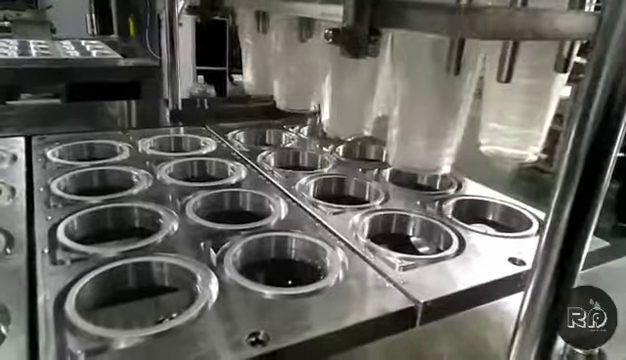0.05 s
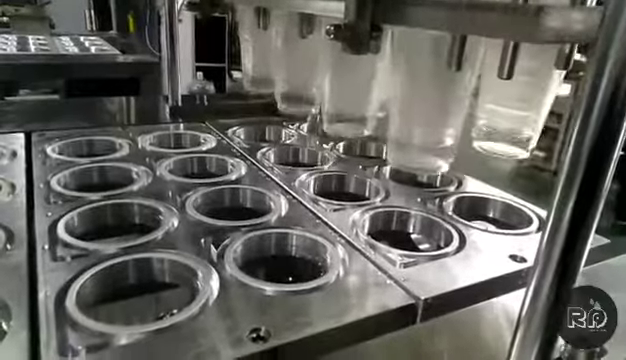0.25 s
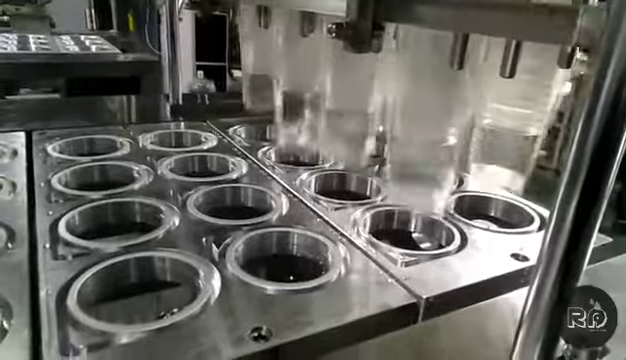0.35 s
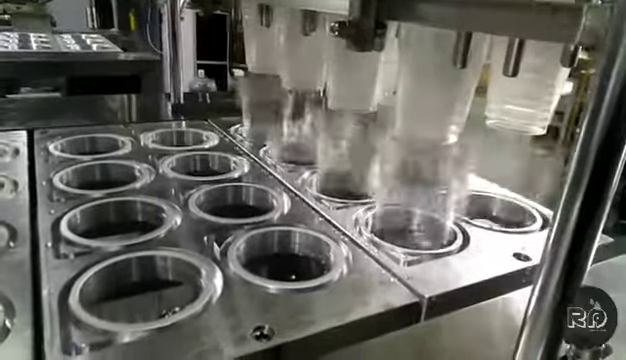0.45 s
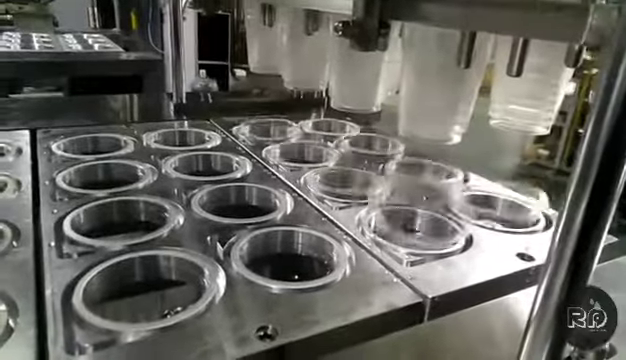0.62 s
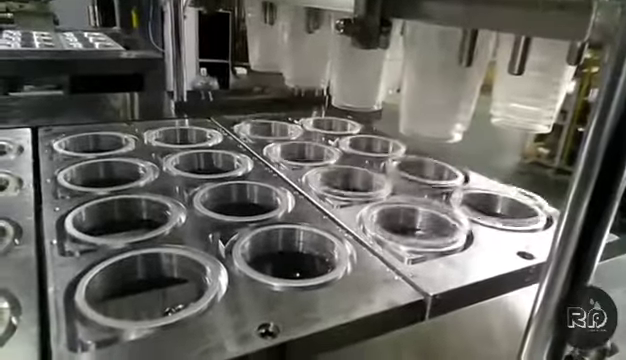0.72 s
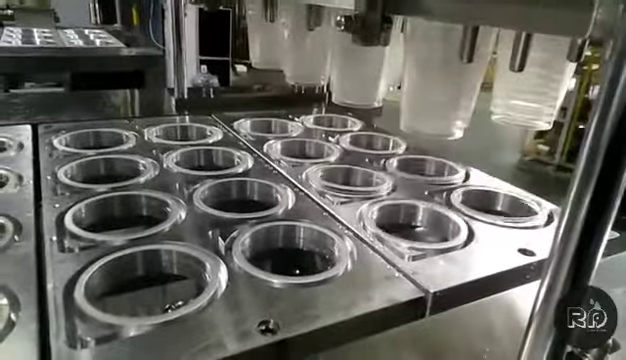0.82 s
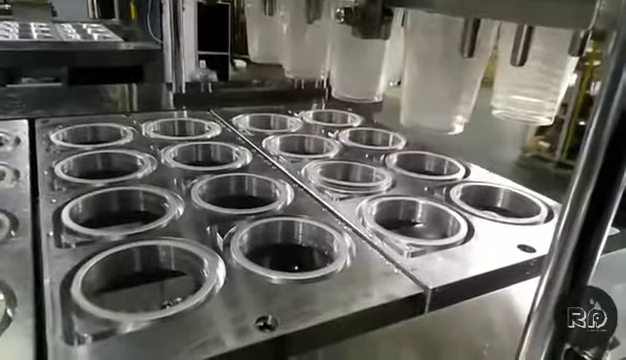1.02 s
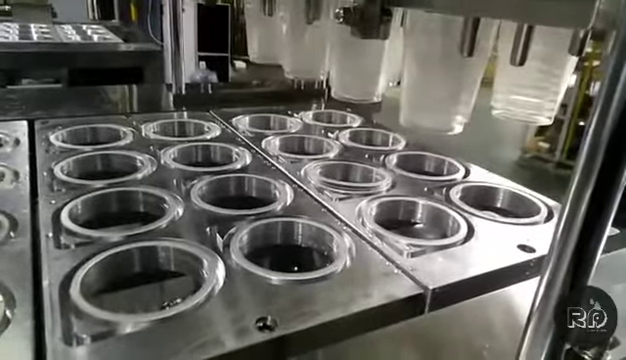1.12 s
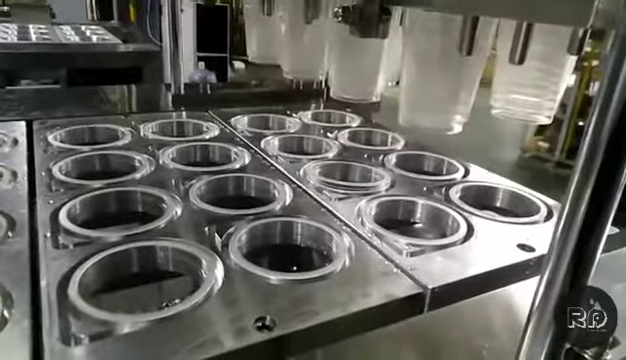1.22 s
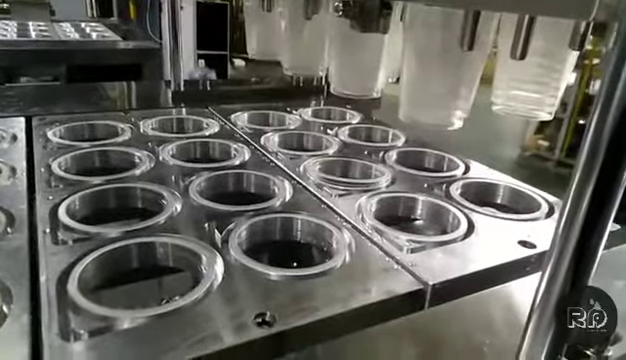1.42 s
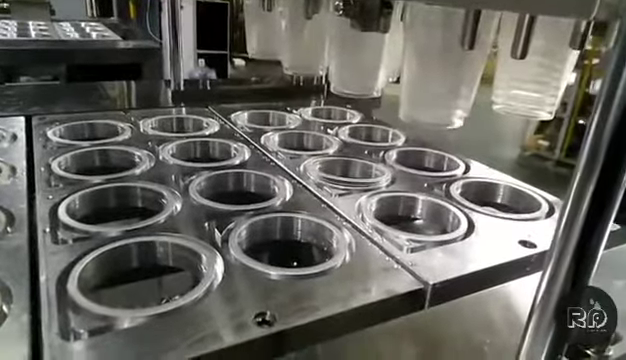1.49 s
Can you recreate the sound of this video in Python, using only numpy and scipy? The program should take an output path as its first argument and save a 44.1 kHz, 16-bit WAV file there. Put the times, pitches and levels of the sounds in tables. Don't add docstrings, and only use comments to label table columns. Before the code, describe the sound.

Plastic cups dropping in a machine: after a near-silent start, a valve snaps open at 0.2 s with bright, slightly whistling air hiss, fading by 0.6. Cups scrape loose around 0.5, clatter hollowly at 0.6-0.68, and rattle until 0.85, with a hard clack at 0.81. A stronger air burst at 0.88 decays by 1.4. Low rolling rumble and hall hum continue, with dull knocks near 1.3.

```python
import sys
import numpy as np
from scipy import signal
from scipy.fft import rfft, irfft, next_fast_len
from scipy.io import wavfile
from scipy.ndimage import uniform_filter1d, map_coordinates

SR = 44100
rng = np.random.default_rng(int(sys.argv[2]) if len(sys.argv) > 2 else 0)


def volts(x):
    e = np.asarray(x, float) / 20
    return 10 ** e


def to_wav(s):
    ch = np.atleast_2d(s).T
    pcm = np.round(np.clip(ch, -1, 1) * 32767)
    wavfile.write(sys.argv[1], SR, pcm.astype(np.int16))


N = 68355

# [f/Hz, density/dB]
HALL_SPECTRUM = [(35, -63), (60, -14.5), (189, -7.5), (461, -8.5), (593, -20), (855, -11), (1380, -25),
                 (1700, -18.5), (14300, -33)]
# [f/Hz, level/dB]
MOTOR_TONES = [(748, -44.5), (243, -50)]
HALL_DB, MOTOR_SWAY_DB = -37, 2.5
SETTLE_S, SETTLE_DB = 0.12, -13.5

# [middle t/s, half length/s, level/dB]
LEAKS = [
    (0.088, 0.07, -41.5),
    (0.769, 0.037, -38),
    (1.42, 0.23, -56.5),
]
# [t/s, level/dB, T60/s]
VALVE_TICKS = [
    (.2095, -23, 0.01),
    (0.5954, -22, 0.015),
    (0.8132, -22, 0.0072),
    (.8762, -12.5, 0.031),
    (1.38, -30.5, .012),
    (1.464, -47, 0.033),
]
# [f/Hz, density/dB]
LEAK_SPECTRUM = [(7000, -7.5), (10500, -9.5), (12500, -9.5), (14200, -0.5)]

# [t/s, level/dB]
VENT_PRESSURES = [
    [(.082, -47), (.109, -43), (.15, -46.5), (.2, -46.5)],
    [(.2015, -35.5), (.2085, -29), (.2095, -20.5), (.222, -19), (.272, -21.5), (.29, -23.5), (.35, -23.5),
     (.45, -28), (.59, -36.5)],
    [(.8752, -44), (.8765, -17.5), (.9, -16.5), (.95, -19.5), (1.04, -22), (1.15, -28), (1.3, -36.5),
     (1.46, -46.5), (1.55, -84)],
    [(.6, -26.5), (.7, -39), (.87, -41.5)],
]
# [fizz level/dB, roar level/dB]
VENT_COLOURS = [(-2, 4), (3.5, -3), (1.7, 0), (-0.5, 0.1)]
# [f/Hz, density/dB]
JET_SPECTRUM = [(880, -14), (1500, -12), (2500, -12.5), (3300, -6), (4300, -3.5), (5400, -2.5),
                (7500, -1.5), (14300, -20)]
# [f/Hz, density/dB]
FIZZ_SPECTRUM = [(3000, -75), (7000, -9), (9000, -1.5), (11000, -8), (12500, -7), (13700, -4.5), (14400, 1)]
# [f/Hz, density/dB]
ROAR_SPECTRUM = [(200, 10.5), (500, 5.5), (1200, 4), (2500, 3), (4000, -46)]
FULL_DB, FIZZ_DB, ROAR_DB = -20, -2, -13
FIZZ_GROWS, ROAR_GROWS = 2.41, 1.8
FIZZ_OFFSET_DB = -3
JET_ALIKE, LEFT_LAG_S = 0.14, 0.000389
# [opening t/s, shutting t/s, level/dB]
WHISTLES = [
    (0.2114, 0.268, -25),
    (0.8726, 0.957, -30.5),
]
MUFFLER_HZ, MUFFLER_WIDTH_HZ, SHUT_T60_S = 5070, 900, 0.12

# [t/s, level/dB]
CARRIAGE_EFFORT = [(0.1, -100), (0.136, -93), (0.26, -41), (0.338, -37), (0.378, -36), (0.684, -32.5),
                   (0.894, -33.5), (1.06, -34.5), (1.222, -41), (1.55, -42)]
# [f/Hz, width/Hz, level/dB]
FRAME_MODES = [(249.5, 73, 2.5), (392, 97, -2.5), (520, 307, -9.5), (765, 100, -10), (900, 580, -19)]
FRAME_LOW_HZ = 185

# [t/s, peak level/dB, f/Hz, T60/s]
KNOCKS = [(0.17, -31, 228, 0.091), (0.208, -17, 331, 0.037), (.209, -24, 39.3, 0.17), (.594, -23, 42, 0.12),
          (0.626, -19, 2390, 0.044), (.595, -11, 318, 0.037), (.605, -9, 1244, .028),
          (0.6262, -10, 438, 0.044), (.636, -15, 400, 0.031), (0.663, -23, 427, 0.053),
          (.673, -21, 362, 0.076), (.651, -28, 414, 0.027), (0.752, -19.5, 342, 0.047),
          (.786, -16, 427, 0.082), (0.8343, -20, 493, .06), (.786, -18, 1444, 0.027),
          (.787, -24, 2350, 0.026), (0.8137, -6, 513, 0.023), (.8138, -11.5, 1950, 0.017),
          (.814, -32, 40, 0.15), (.877, -27, 60.7, 0.089), (1.288, -22.5, 238, 0.093),
          (1.321, -17, 306, 0.031), (1.534, -38, 1700, 0.056)]
# [f/Hz, T60/s]
ROOM_DECAY = [(200, 0.6), (2000, 0.44), (10000, 0.71)]
ROOM_DB = -6

# [t/s, peak level/dB, pitch factor, favoured f/Hz, crackle level/dB]
CUP_CONTACTS = [(.285, -29, 1.36, 496, -30), (0.409, -27.5, 1.05, 310, -28), (0.481, -20.5, 1.12, 485, -5),
                (.487, -31, 1.07, 1600, -8.5), (0.495, -25, 1.1, 900, -21), (0.504, -18.5, 1.1, 450, -19),
                (0.52, -19.5, 0.64, 306, -22), (0.544, -30, 1.23, 560, -28), (0.551, -25, 1.09, 400, -25),
                (.595, -11.5, 1.04, 636, -11.5), (0.601, -22.5, 1.01, 1190, -14),
                (.606, -17.5, 0.784, 1010, -7.5), (.609, -21, 0.758, 313, -28),
                (0.6197, -11, 1.173, 433, -12.5), (.626, -9.5, 1, 900, -16.5), (.629, -16, 1.25, 1720, -15),
                (.636, -12.5, 1.03, 950, -16), (0.652, -14.5, .99, 1150, -19), (.664, -24, 1.4, 1000, -11),
                (.672, -30, 1.01, 900, -12), (0.693, -25, 0.99, 362, -30), (.706, -26.5, 1.045, 358, -26),
                (.738, -27.5, 1.05, 704, -18), (.750, -20, 1, 347, -15), (.754, -17.5, 1.14, 975, -19),
                (.766, -28, 0.98, 325, -29), (.780, -21.5, 1.72, 525, -16), (.7855, -15.5, 1.08, 1470, -33),
                (0.8136, -25, 0.85, 1540, -1.5), (.824, -28, 1.42, 520, -41), (.830, -19, 1.4, 493.2, -39),
                (0.855, -27, 1.2, 465, -31), (.876, -18, 1.2, 1010, -4)]
# [f/Hz, level/dB, T60/s]
CUP_MODES = [(256, -11.5, 0.055), (357.5, -1, 0.05), (731, -1.5, 0.027), (950, -5.5, 0.024),
             (1216, -6, 0.029), (1363, -3.5, 0.023), (1950, -10, 0.011), (2345, -5.5, 0.022)]
# [f/Hz, density/dB]
CRACKLE_SPECTRUM = [(1500, 9.5), (2600, 1.5), (3200, -2), (6000, -1), (9000, -7), (14300, -9.5)]
FAVOUR_DB, FAVOUR_OCTAVES = 8.5, 0.55
PUSH_S, CRACKLE_T60_S = 0.0016, 0.067
SCATTER_DB, SCATTER_PITCH = 1.2, 0.006
HITS_PAN_DB = 1.4

# [start t/s, end t/s, level/dB]
SLIDES = [
    (.477, 0.554, -33.5),
    (0.6, 0.635, -31.5),
    (0.647, 0.723, -37.5),
    (0.729, 0.798, -35),
]
# [f/Hz, width/Hz, level/dB]
STACK_MODES = [(400, 100, 0.5), (776, 250, -3.5), (1150, 270, -5), (1600, 130, -7), (1810, 52, -4),
               (2400, 190, -11)]
SLIDE_EDGE_S = 0.0029

# [f/Hz, level/dB]
MIC_RESPONSE = [(30, -22), (100, -19.5), (170, -1.5), (14250, 2), (14600, -63), (15800, -60), (15900, -140)]
# [f/Hz, level/dB]
PORT_RESPONSE = [(4000, 0.05), (5200, 2.5), (7000, -1.07), (10000, -2.5), (12500, 1)]
START_S, FADE_S = 0.083, 0.0014
CEILING, CEILING_HARDNESS = 1.02, 8
# [f/Hz, level/dB]
FIRST_GUESS = [(200, -58), (2000, -57.5), (4000, -82.5), (14000, -79.5)]
# [f/Hz, level/dB]
MARGIN = [(200, -4.5), (1000, -4.5), (2500, -0.5), (5000, 2), (8000, 4), (11000, 3), (14000, 3.5)]
LEARN_S, FORGET_DB_PER_S, SPREAD_HZ = 0.46, 12, 144
DEPTH_DB, KNEE_DB = -33, 1.3
SOFT_DB, SOFT_KNEE_DB = -9.5, 6


def unit(x):
    return x / np.sqrt(np.mean(x ** 2) + 1e-20)


def along(points, hz):
    f, value = np.transpose(points)
    return np.interp(np.log(hz + 1), np.log(f + 1), value)


def curve(rows, outside=None):
    s, value = np.transpose(rows)
    return np.interp(np.arange(N) / SR, s, value, outside, outside)


def wobble(rate):
    knots = rng.standard_normal(int(N * rate / SR) + 4)
    return map_coordinates(knots, [np.arange(N) * rate / SR])


def filtered(x, response):
    size = next_fast_len(N + SR // 2)
    spectrum = rfft(x, size) * response(np.fft.rfftfreq(size, 1 / SR))
    return irfft(spectrum, size)[..., :N]


def resonances(peaks):
    def response(f):
        return sum((-1) ** k * volts(db) * 1j * f * width / (centre * centre - f * f + 1j * f * width)
                   for k, (centre, width, db) in enumerate(peaks))
    return response


def shaped(points):
    below, above = (points[0][0] / 2, -70), (points[-1][0] * 0.99, -70)
    return lambda hz: volts(along([below] + list(points) + [above], hz))


def rush(response, alike, lag_s=0):
    a, b = rng.standard_normal((2, N))
    angle = np.arccos(np.clip(alike, 0, 1)) / 2
    shared, opposed = np.cos(angle) * a, np.sin(angle) * b
    pair = np.array([shared + opposed, shared - opposed])
    lags_s = lag_s * np.array([[1], [0]])
    return unit(filtered(pair, lambda hz: response(hz) * np.exp(-2j * np.pi * hz * lags_s)))


def hall():
    t = np.arange(N) / SR
    tones = sum(volts(db + MOTOR_SWAY_DB * wobble(6.7)) * np.sin(2 * np.pi * hz * t + 0.71 * wobble(11.74))
                for hz, db in MOTOR_TONES)
    hum = volts(HALL_DB + 0.41 * wobble(11.8)) * rush(shaped(HALL_SPECTRUM), 0.45)
    settle = volts(SETTLE_DB * np.exp(-np.maximum(t - START_S, 0) / SETTLE_S))
    return settle * (hum + tones)


def leaks():
    t = np.arange(N) / SR
    swell = sum(volts(db) * np.exp(-((t - s) / half) ** 4) for s, half, db in LEAKS)
    tick = sum((t > s) * volts(db - 60 * np.abs(t - s) / t60) for s, db, t60 in VALVE_TICKS)
    return (swell + tick) * rush(shaped(LEAK_SPECTRUM), 0.14)


def air():
    levels_db = np.array([curve(vent, -120) for vent in VENT_PRESSURES])
    loudest = levels_db.argmax(axis=0)
    fizz_db, roar_db = np.transpose(VENT_COLOURS)[:, loudest]
    level_db = levels_db.max(axis=0) + 0.18 * wobble(58.9)
    under_db = np.minimum(level_db - FULL_DB, 4)

    body = volts(level_db) * rush(shaped(JET_SPECTRUM), JET_ALIKE, LEFT_LAG_S)
    fizz_db = FULL_DB + FIZZ_DB + FIZZ_OFFSET_DB + fizz_db + FIZZ_GROWS * under_db + 0.59 * wobble(149.2)
    fizz = volts(fizz_db) * rush(shaped(FIZZ_SPECTRUM), JET_ALIKE, LEFT_LAG_S)
    roar_db = FULL_DB + ROAR_DB + roar_db + ROAR_GROWS * under_db
    roar = volts(roar_db) * rush(shaped(ROAR_SPECTRUM), 0.56, LEFT_LAG_S)
    return (body + fizz + roar + whistle()) * volts([[2.5], [-1.5]])


def whistle():
    t = np.arange(N) / SR
    gate = sum((t > opens) * volts(db - 60 * np.maximum(t - shuts, 0) / SHUT_T60_S)
               for opens, shuts, db in WHISTLES)
    cavity = resonances([(MUFFLER_HZ, MUFFLER_WIDTH_HZ, 0)])
    return gate * rush(lambda f: cavity(f) ** 2, JET_ALIKE, LEFT_LAG_S)


def carriage():
    frame = resonances(FRAME_MODES)
    effort = volts(curve(CARRIAGE_EFFORT) + 0.9 * wobble(45.23))
    return effort * rush(lambda f: frame(f) / (1 + (FRAME_LOW_HZ / (f + 1)) ** 4), 0.82)


def knocks():
    t = np.arange(N) / SR
    out = np.zeros(N)
    for s, db, hz, t60 in KNOCKS:
        decay = (t > s) * volts(db - 60 * np.abs(t - s) / t60)
        onset = np.tanh((t - s) * hz / 2)
        out += decay * onset * np.sin(2 * np.pi * hz * (t - s))
    return out


def room(x):
    hz, t, z = signal.stft(rng.standard_normal((2, SR // 2)), SR, nperseg=256)
    decay = volts(-60 * t / along(ROOM_DECAY, hz)[:, None])
    tail = signal.istft(z * decay, SR, nperseg=256)[1]
    tail = tail / np.linalg.norm(tail[0])
    delayed = np.pad(x, (300, 0))[None]
    return signal.fftconvolve(delayed, tail, axes=1)[:, :N]


def cup_favour(hz, favour_hz):
    octaves = np.log2(hz / favour_hz)
    return FAVOUR_DB * np.exp(-(octaves / FAVOUR_OCTAVES) ** 2) - 9 * max(octaves - 1, 0)


def cups():
    out, crackle = np.zeros((2, N + SR)), np.zeros(N + SR)
    t = np.arange(SR // 8) / SR
    chance = rng.standard_normal((40, len(CUP_MODES), 3))
    for (s, db, pitch, favour_hz, crackle_db), luck in zip(CUP_CONTACTS, chance):
        ring = np.zeros(len(t))
        for (hz, level_db, t60), (a, b, c) in zip(CUP_MODES, luck):
            mode_db = level_db + cup_favour(hz * pitch, favour_hz) + SCATTER_DB * a
            mode_hz = hz * pitch * (1 + SCATTER_PITCH * b)
            ring += volts(mode_db - 60 * t / t60) * np.sin(2 * np.pi * mode_hz * t + 0.62 * c)
        ring = ring * (1 - np.exp(-t / PUSH_S))
        pan = volts(np.array([[0.7], [-0.7]]) * luck[0, 2])
        start = round(s * SR)
        out[:, start:][:, :len(t)] += volts(db) * ring / np.abs(ring).max() * pan
        crackle[start:][:len(t)] += volts(db + crackle_db - 60 * t / CRACKLE_T60_S)
    roughness = volts(3.2 * wobble(400))
    return out[:, :N] + crackle[:N] * roughness * rush(shaped(CRACKLE_SPECTRUM), 0.092)


def slides():
    t = np.arange(N) / SR
    gate = sum(volts(db) * np.clip(np.minimum(t - start, end - t) / SLIDE_EDGE_S, 0, 1)
               for start, end, db in SLIDES)
    return gate * volts(2.9 * wobble(150)) * rush(resonances(STACK_MODES), 0.49)


def scene():
    hits = (cups() + knocks()) * volts([[HITS_PAN_DB], [-HITS_PAN_DB]])
    echoes = volts(ROOM_DB) * room(hits.mean(axis=0))
    return hall() + leaks() + air() + carriage() + hits + echoes + slides()


def suppress(x):
    hz, t, z = signal.stft(x, SR, nperseg=512, noverlap=384)
    near = np.exp(-((hz[:, None] - hz) / SPREAD_HZ) ** 2)
    power = near @ np.abs(z) ** 2 / near.sum(axis=1)[:, None]
    level_db = 10 * np.log10(uniform_filter1d(power, size=9, axis=1) + 1e-12)

    first = along(FIRST_GUESS, hz)[:, None]
    keep = np.exp(-t[1] / LEARN_S)
    guess = first + signal.lfilter([1 - keep], [1, -keep], (level_db - first) * (t > START_S), axis=1)
    forgotten = FORGET_DB_PER_S * t
    guess = np.maximum.accumulate(guess + forgotten, axis=1) - forgotten

    over = level_db - guess - along(MARGIN, hz)[:, None]
    deep_db = DEPTH_DB / np.exp(over / KNEE_DB)
    soft_db = SOFT_DB / (0.5 + np.exp(over / SOFT_KNEE_DB - 1.5))
    return signal.istft(z * volts(deep_db + soft_db), SR, nperseg=512, noverlap=384)[1][:N]


def band_limit(x):
    return signal.sosfilt(signal.butter(12, 15900, fs=SR, output="sos"), x)


def record(dry):
    x = filtered(dry, lambda hz: volts(along(MIC_RESPONSE, hz) + along(PORT_RESPONSE, hz)))
    start = np.clip((np.arange(N) / SR - START_S) / FADE_S, 0, 1)
    x = np.array([suppress(x[0]), x[1]]) * start
    mix = x / (1 + np.abs(x / CEILING) ** CEILING_HARDNESS) ** (1 / CEILING_HARDNESS)
    return band_limit(mix)


dry = scene()
out = record(dry)
to_wav(out)
```